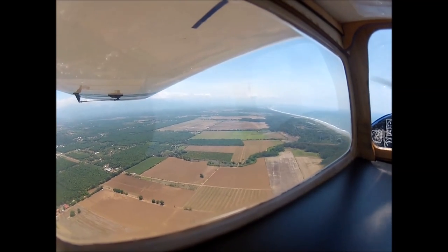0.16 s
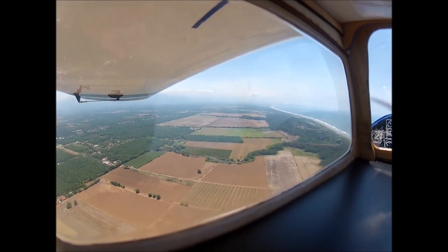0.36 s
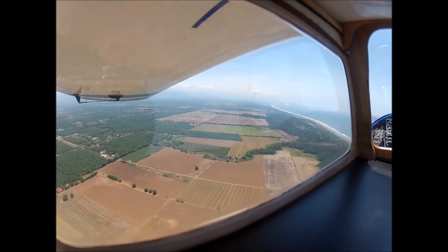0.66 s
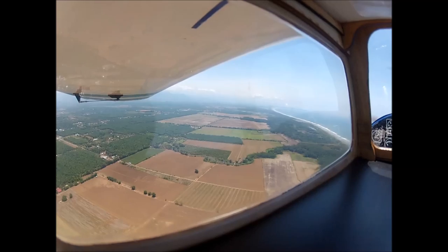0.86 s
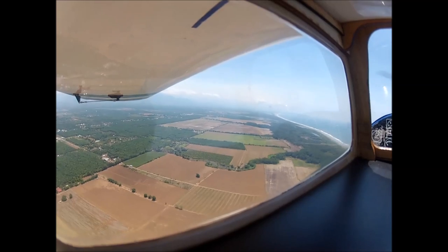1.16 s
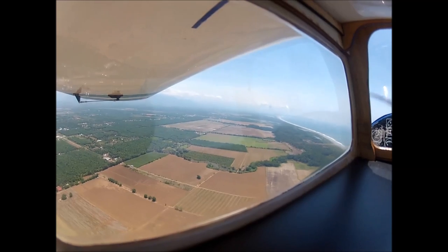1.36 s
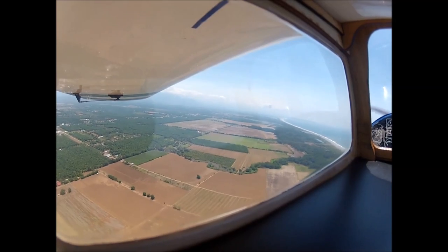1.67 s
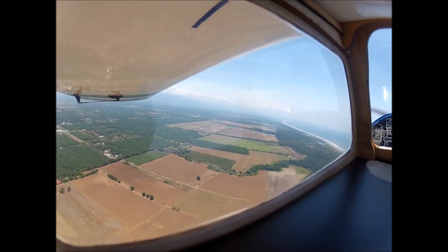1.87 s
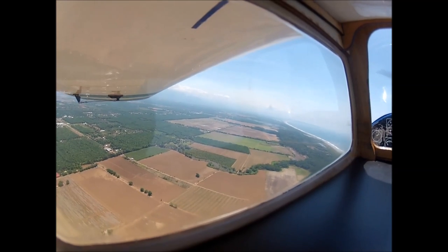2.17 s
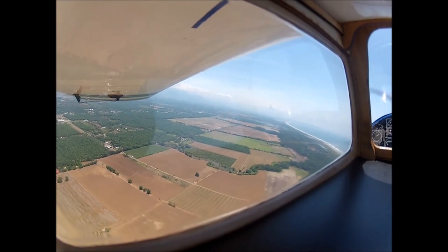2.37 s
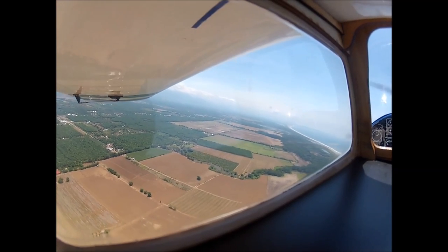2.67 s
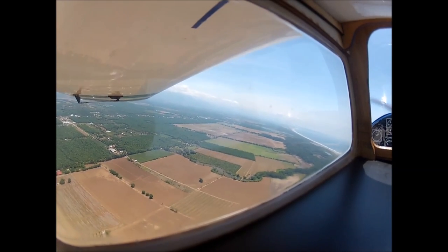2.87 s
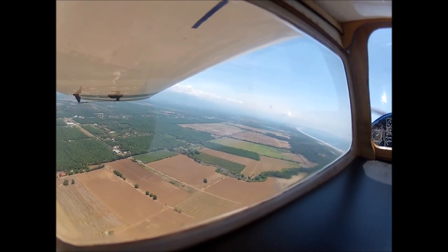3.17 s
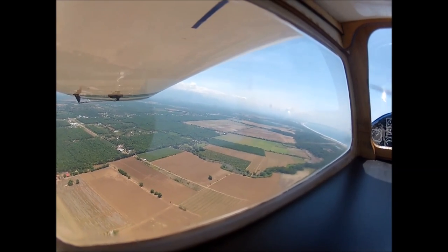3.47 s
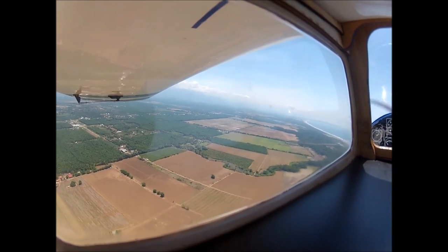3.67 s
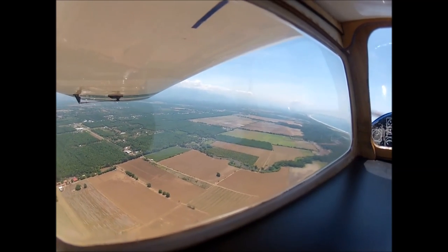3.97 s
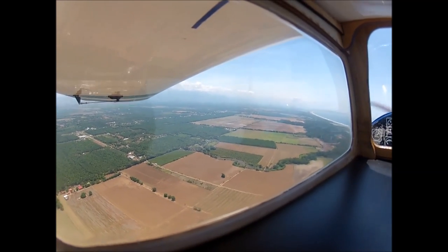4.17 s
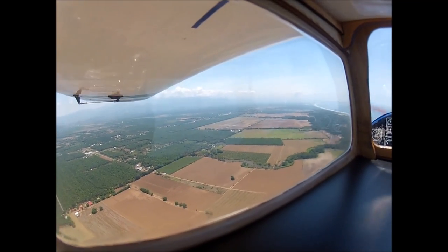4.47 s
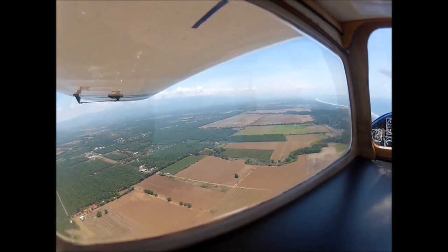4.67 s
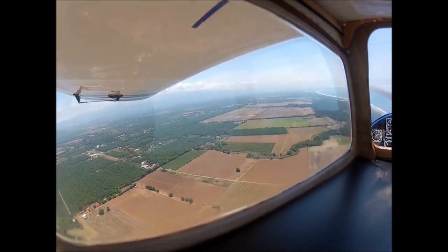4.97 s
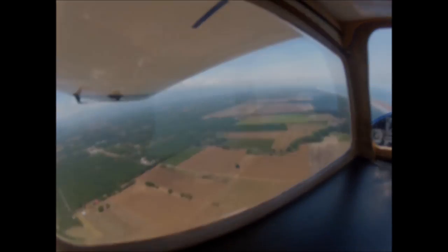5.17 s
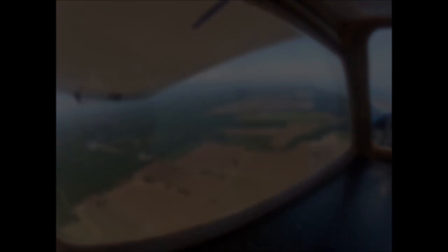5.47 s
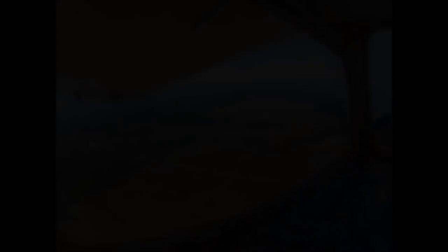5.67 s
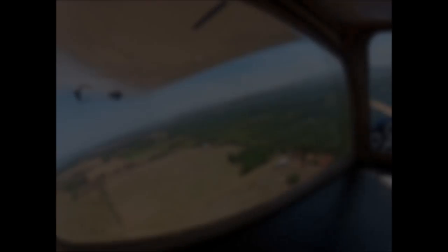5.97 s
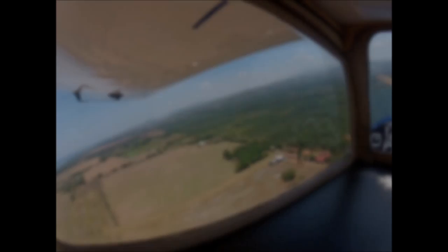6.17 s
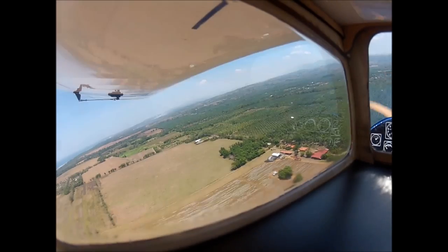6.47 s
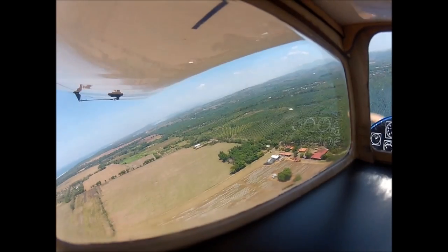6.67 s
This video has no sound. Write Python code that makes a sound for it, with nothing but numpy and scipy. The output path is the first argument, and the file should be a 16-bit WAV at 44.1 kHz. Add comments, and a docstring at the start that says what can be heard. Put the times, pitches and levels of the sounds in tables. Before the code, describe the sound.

Inside a small piston plane's cabin, a steady booming engine and propeller drone slowly eases, then dissolves into a slower, pulsing throb with rising air rush.

```python
"""A steady engine and two-blade propeller drone fills a small piston plane's cabin, which booms near 330 Hz.
The drone slowly eases off, then dissolves into a slower, more pulsing one that swells with the rushing air.
Drones are sums of shaft orders; the air is filtered noise, puffed at each firing and lifted by gusts.
Holding the sound at 8000 samples a second mirrors the drone into a thin buzz around 8 kHz."""
import sys
import numpy as np
from scipy import signal
from scipy.fft import rfft, irfft, next_fast_len
from scipy.io import wavfile
from scipy.ndimage import map_coordinates

SR = 44100
rng = np.random.default_rng(int(sys.argv[2]) if len(sys.argv) > 2 else 0)


def transcribe(signal):
    """Save signal, clipped to [-1, 1], as a 16-bit WAV file at the path in sys.argv[1]."""
    frames = np.atleast_2d(signal).T
    limited = np.clip(frames, -1, 1)
    pcm = np.round(limited * 32767).astype(np.int16)
    wavfile.write(sys.argv[1], SR, pcm)


N = 301203
TIME = np.arange(N) / SR  # s
CHANGE_S = 5.31  # the air starts to change over from cruise to slower running


def amp(db):
    """Decibels to gain."""
    return 10 ** (np.asarray(db) / 20)


def unit(x):
    """Scale to rms 1."""
    return x / np.sqrt(np.mean(x ** 2) + 1e-20)


def curves(rows):
    """One value per sample for each column after the time."""
    seconds, *columns = np.transpose(rows)
    return [np.interp(TIME, seconds, column) for column in columns]


def ramp(start, end):
    """Rises from 0 to 1 between two times in seconds."""
    return np.clip((TIME - start) / max(end - start, 1e-3), 0, 1)


def wobble(rate):
    """A smooth random curve, rate knots a second."""
    knots = rng.standard_normal(2048)
    coarse = np.arange(0, N + 64, 64)
    smooth = map_coordinates(knots, [coarse * rate / SR], mode="wrap")
    return np.interp(np.arange(N), coarse, smooth)


def eased_db(start, db_per_s):
    """Level that holds, then falls at a steady rate."""
    return -db_per_s * np.maximum(TIME - start, 0)


def coloured(x, spectrum, modes=()):
    """x through a (Hz, dB) spectrum with (Hz, width Hz, dB) resonances on top, at rms 1."""
    m = next_fast_len(N + 8192)
    f = np.fft.rfftfreq(m, 1 / SR)
    hz, db = np.transpose(spectrum)
    gain = amp(np.interp(np.log(f + 1), np.log(hz), db, left=-120, right=-120))
    lift = sum(amp(level) ** 2 / (1 + (2 * (f - centre) / width) ** 2) for centre, width, level in modes)
    return unit(irfft(rfft(x, m) * gain * np.sqrt(1 + lift), m)[:N])


def ring_phases(db):
    """Minimum phases: they make a row of harmonics one sharp push followed by its ringing."""
    log_gain = np.log(amp(np.r_[np.min(db), db]))
    mirrored = np.r_[log_gain, log_gain[-2:0:-1]]
    return -signal.hilbert(mirrored).imag[1:len(log_gain)]


def partial(turns, order, phase, rough, rate):
    """One shaft order near rms 1, shaken in size and phase by turbulence."""
    angle = 2 * np.pi * order * turns + phase
    in_phase = (1 + rough * wobble(rate)) * np.cos(angle)
    sideways = rough * wobble(rate) * np.sin(angle)
    return np.sqrt(2 / (1 + 2 * rough ** 2)) * (in_phase + sideways)


def interference(speed, early, late, step):
    """Complex gain of an order that exhaust and propeller share: their phase apart follows the speed."""
    uncancelled = 0.064  # share that never cancels
    null = np.median(speed) + early + (late - early) * ramp(3.8, 4.0)
    return np.sin(np.pi / 2 * (speed - null) / step) + 1j * uncancelled


def cruise():
    """Two firings and two blades a turn give the even orders; unequal cylinders give the odd ones."""
    # Each row: time in seconds, pitch of the boom in Hz; the boom is a shaft order, so it tells the speed
    boom_pitch = [(0.0, 330.2), (0.07, 334.6), (0.55, 332.2), (1.01, 336.3), (1.33, 331.3), (1.59, 335.1),
                  (1.75, 332.5), (1.93, 336.3), (2.11, 332.4), (2.29, 335.2), (2.56, 327.3), (2.71, 332.5),
                  (3.04, 333.3), (3.16, 336.3), (3.48, 327.3), (3.84, 327.6), (3.92, 332.8), (5.2, 333.1)]
    # Strength of the shaft orders before and after the mix shifts. Each row: shaft order, relative level in dB
    early_orders = [(1, -28), (2, -3), (3, -15), (4, -3.5), (5, -10), (6, 0), (7, -18.5), (8, 0.76),
                    (9, -5.5), (10, -7), (11, -11.5), (12, -18.5), (13, -21.5), (14, -14), (15, -32.5),
                    (16, -20), (17, -21), (18, -24), (19, -23), (20, -18.5), (21, -36.5), (22, -19),
                    (23, -27.5), (24, -31.5), (25, -40), (26, -27.5), (27, -34), (28, -36)]
    late_orders = [(1, -29), (2, -1.5), (3, -12.5), (4, -1.5), (5, -4), (6, 0), (7, -15), (8, 3), (9, -5.5),
                   (10, -4.5), (11, -9), (12, -25.5), (13, -15), (14, -21), (15, -39), (16, -50),
                   (17, -23.5), (18, -14.5), (19, -18), (20, -17.5), (21, -32), (22, -19.5), (23, -25.5),
                   (24, -34.5), (25, -33.5), (26, -28), (27, -39), (28, -29.5)]
    # Orders that exhaust and propeller share. Each row: shaft order, speed where they cancel early,
    # the same late, step from there to adding fully; speeds in turns per s above the median
    cancelling = [(4, -0.59, -0.48, 1.42), (6, 0.015, 0.33, -0.89)]
    boom_order, firing_level_db = 8, -24.5  # the firing note is the second order
    speed = curves(boom_pitch)[0] / boom_order
    turns = np.cumsum(speed) / SR
    firing_db = firing_level_db + eased_db(start=1.76, db_per_s=2.73)
    early, late = np.array(early_orders)[:, 1], np.array(late_orders)[:, 1]
    shift = ramp(2.92, 2.96)

    def shape(order):
        """Level of an order in dB as the mix shifts from early to late."""
        return early[order - 1] * (1 - shift) + late[order - 1] * shift

    shared = {round(order): interference(speed, *nulls) for order, *nulls in cancelling}
    flips = np.pi / 2 * np.tanh(4 * wobble(5))  # the odd orders flip over by half a cycle at random moments
    stray = flips + 0.38 * wobble(9)  # and their phase wanders a little
    orders = np.arange(1, len(early) + 1)
    smear = 0.08 * orders ** 2  # cabin reflections delay the higher orders and spread each push
    drone = np.zeros(N)
    for k, phase in enumerate(ring_phases(early) - smear, 1):
        gain = amp(firing_db + shape(k) - shape(order=2)) * shared.get(k, 1)
        if k % 2:
            tone = partial(turns, k, phase + stray, rough=0.21, rate=12)
        elif k <= boom_order:
            # the lowest even orders are clean
            tone = partial(turns, k, phase + np.angle(gain), rough=0.031, rate=13)
        else:
            tone = partial(turns, k, phase, rough=0.05, rate=13)
        drone += np.abs(gain) * tone
    return drone, turns


def slow_running():
    """At the lower speed the firings are even, and the tenth order meets the cabin boom."""
    # Each row: time in seconds, shaft speed in turns per s
    slow_speed = [(5.6, 33.2), (5.866, 33.6), (6.088, 33.5), (6.288, 32.8), (6.59, 33.6), (6.83, 33.4)]
    # Each row: time in seconds, firing level in dB before a small trim, cabin boom level in dB
    slow_levels = [(5.7, -37, -26.5), (5.85, -35, -24), (6.1, -33.5, -27), (6.5, -29.5, -19.5),
                   (6.83, -27, -19)]
    # Strength of the even orders. Each row: shaft order, relative level in dB
    slow_orders = [(2, -6), (4, -6.5), (6, -23), (8, -5.5), (10, 5), (12, -13), (14, -12), (16, -32.5),
                   (18, -20), (20, -16), (22, -37), (24, -26.5), (26, -39)]
    turns = np.cumsum(curves(slow_speed)[0]) / SR
    firing_db, boom_db = curves(slow_levels)
    shape = np.array(slow_orders)[:, 1]
    drone = np.zeros(N)
    for k, phase in enumerate(ring_phases(shape), 1):
        if k == 5:  # the boom follows its own level
            drone += amp(boom_db) * partial(turns, 2 * k, phase, rough=0.13, rate=25)
        else:
            gain = amp(firing_db + shape[k - 1] - shape[1] + 0.8)  # relative to the fourth order
            drone += gain * partial(turns, 2 * k, phase, rough=min(0.046 * k, 0.2), rate=14)
    return drone, turns


def cabin_hum():
    """A wavering tone just above the fifth order; the two beat and make the drone throb."""
    centre_hz, waver_hz, level_db = 214.4, 1.07, -27.5
    cycles = np.cumsum(centre_hz + waver_hz * wobble(3.886)) / SR
    gain = amp(level_db + eased_db(start=1.6, db_per_s=3.3))
    return gain * partial(cycles, order=1, phase=0, rough=0.079, rate=5.53)


def puffs(turns, depth, decay, rise):
    """Noise that swells at each firing; rise and decay are shares of the gap to the next."""
    age = 2 * turns % 1
    swell = np.exp(-age / max(decay, 0.02)) * (1 - np.exp(-age / max(rise, 0.005)))
    return (1 + depth * swell) * rng.standard_normal(N)


def gusts():
    """Lift of the roar and of the hiss in dB: each gust of air is a smooth hump."""
    # Each row: centre in seconds, half length in seconds, roar lift in dB, hiss lift in dB
    gust_rows = [(0.852, 0.1, 2.5, 0.2), (5.484, .13, 2, 1.5), (6.123, 0.098, 0.7, 1.8),
                 (6.386, 0.017, 6.5, 4), (6.83, 0.1, 5.5, 6)]
    lift_db = np.zeros((2, N))
    for centre, length, roar_db, hiss_db in gust_rows:
        hump = np.exp(-((TIME - centre) / length) ** 2)
        lift_db += np.outer([roar_db, hiss_db], hump)
    return lift_db


def cruise_air(turns):
    """Slipstream and exhaust noise, lightly chopped by the firings, shake the cabin and its panels."""
    # Noise colours from low to high. Each row: frequency in Hz, relative density in dB per Hz
    rumble_colour = [(12, -28), (28, -28), (36, -30), (48, -13), (100, -3.5), (150, -5.5), (190, -2.5),
                     (235, 6), (280, 0), (350, 4), (430, -2), (500, -6.5), (700, -34)]
    roar_colour = [(300, -22), (480, -7), (580, 0), (780, -3), (920, -7.5), (1000, -12.5), (1150, -15),
                   (1350, -24.5), (1800, -52)]
    hiss_colour = [(900, -13), (1300, -2.5), (1650, -1), (2000, 2), (2400, 6), (2800, 3.5), (3100, -0.5),
                   (3350, -6.5), (3650, -5), (4000, -7)]
    # Air modes of the cabin, then its ringing panels. Each row: centre in Hz, width in Hz, lift in dB
    cabin_modes = [(129, 4.5, 7), (171, 7.4, 8), (215.3, 5.7, 5)]
    panel_modes = [(1530, 75, 6.5), (1833, 107, 6.5), (2207, 56, 6.5), (3160, 80, 10.5), (3480, 80, 7)]
    base_db = [[-29.5], [-45.5]]  # roar, hiss; each layer is trimmed from these
    roar_db, hiss_db = gusts() + eased_db(start=2.2, db_per_s=3.19) + base_db
    rumble = amp(roar_db + 3.3) * coloured(rng.standard_normal(N), rumble_colour, cabin_modes)
    flutter = wobble(70)  # no two firings are alike
    roar_puffs = amp(0.82 * flutter) * puffs(turns, depth=1.0, decay=0.42, rise=0.27)
    roar = amp(roar_db - 2.5) * coloured(roar_puffs, roar_colour)
    hiss_puffs = amp(0.85 * flutter) * puffs(turns, depth=0.67, decay=0.37, rise=0.099)
    hiss = amp(hiss_db + 1.6) * coloured(hiss_puffs, hiss_colour, panel_modes)
    return rumble + roar + hiss


def slow_air(turns):
    """At the lower speed each exhaust puff stands out with a bark and a sharp rasp."""
    # Noise colours from low to high. Each row: frequency in Hz, relative density in dB per Hz
    rumble_colour = [(12, -24), (40, -25), (60, -4), (110, -3), (170, 0.5), (235, 5), (290, -4),
                     (335, 10.5), (380, -4), (450, -8), (700, -37)]
    roar_colour = [(300, -23), (480, 5), (580, 4.5), (740, 2.5), (880, -1.5), (980, -7.5), (1120, -2),
                   (1260, -14.5), (1400, -21), (1800, -54)]
    rasp_colour = [(900, -29), (1300, -13), (1600, -2), (2050, 3.5), (2250, 3), (2600, 4.5), (3100, -1),
                   (3400, -4.5), (4000, -11)]
    # The bark of each exhaust stroke. Each row: frequency in Hz, filter gain in dB
    bark_colour = [(600, -25), (850, -4), (1000, -4.5), (1130, -8), (1260, -12.5), (1400, -31), (1700, -52)]
    base_db = [[-37], [-50.5]]  # roar, hiss at the changeover; each layer is trimmed from these
    swell_db = 3.5 * (TIME - CHANGE_S)  # 3.5 dB per s
    roar_db, hiss_db = gusts() + swell_db + base_db
    rumble = amp(roar_db + 6.0) * coloured(rng.standard_normal(N), rumble_colour)
    roar = amp(roar_db + 0.1) * coloured(puffs(turns, depth=6.5, decay=0.15, rise=0.043), roar_colour)
    # the steep front of each puff comes a little early or late, strong or weak
    age = 2 * (turns + 0.0009 * wobble(60)) % 1
    fronts = amp(2.6 * wobble(66)) * np.exp(-age / 0.0049)
    bark = amp(roar_db - 10.0) * coloured(fronts, bark_colour)
    crack = amp(hiss_db - 6.0) * coloured(fronts, rasp_colour)
    rasp = amp(hiss_db - 2.5) * coloured(puffs(turns, depth=1.9, decay=0.03, rise=0.013), rasp_colour)
    return rumble + roar + bark + crack + rasp


def scene():
    """The cruise drone dissolves into the slower one under the rush of air."""
    fast, fast_turns = cruise()
    slow, slow_turns = slow_running()
    drone = (fast + cabin_hum()) * (1 - ramp(5.35, 5.85)) + slow * ramp(5.3, 5.57)
    slowed = ramp(CHANGE_S, 6.38)
    air = np.sqrt(1 - slowed) * cruise_air(fast_turns) + np.sqrt(slowed) * slow_air(slow_turns)
    return (drone + air)[None]


def record(dry):
    """Each coarse sample is held until the next; the steps mirror the sound around 8 and 16 kHz."""
    hold_hz, top_hz = 8000, 15400  # nothing passes above the top
    coarse = signal.resample_poly(dry, hold_hz, SR, axis=1)
    held = np.repeat(coarse, 6, axis=1)
    steps = signal.resample_poly(held, SR, 6 * hold_hz, axis=1)[:, :N]
    m = next_fast_len(N + 8192)
    passed = np.fft.rfftfreq(m, 1 / SR) < top_hz
    return irfft(rfft(steps, m) * passed, m)[:, :N]


dry = scene()
out = record(dry)
transcribe(out)
```